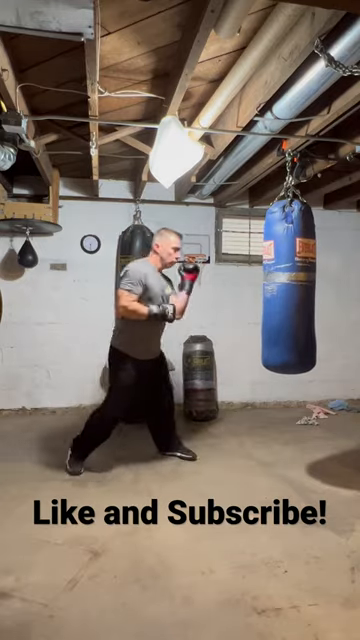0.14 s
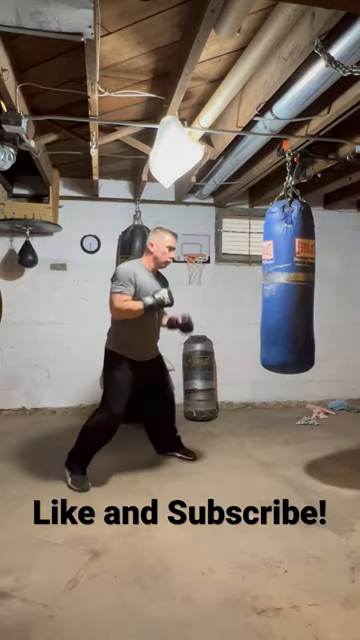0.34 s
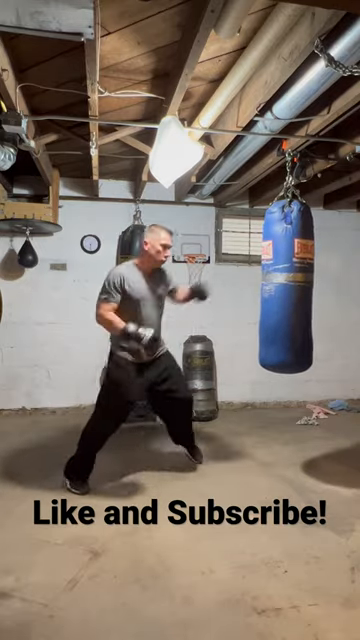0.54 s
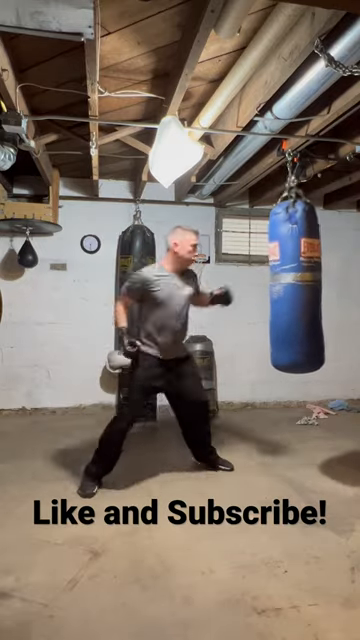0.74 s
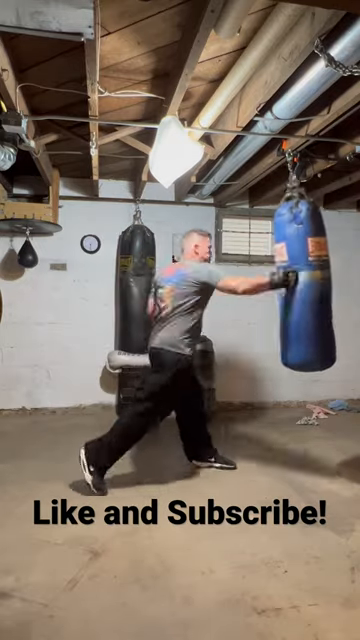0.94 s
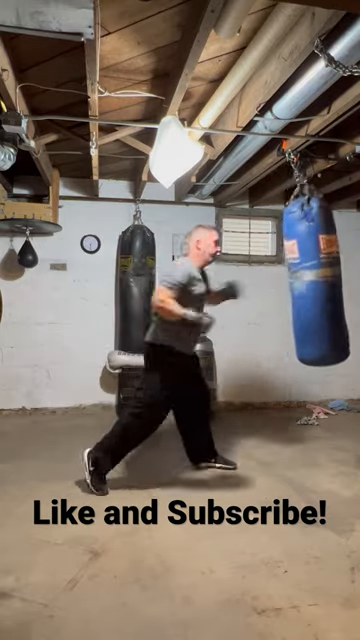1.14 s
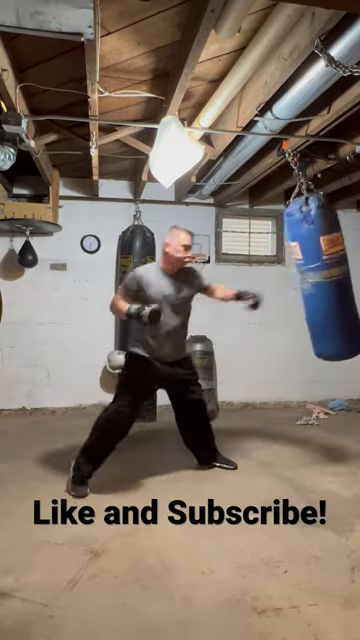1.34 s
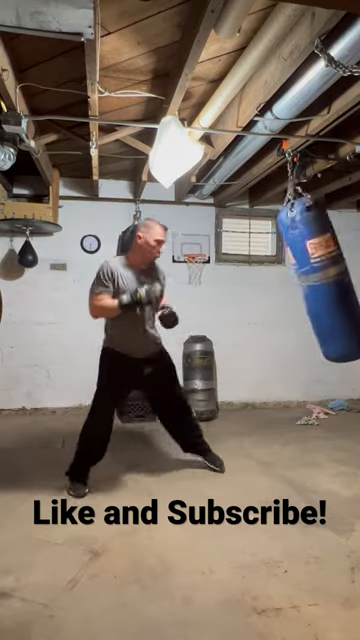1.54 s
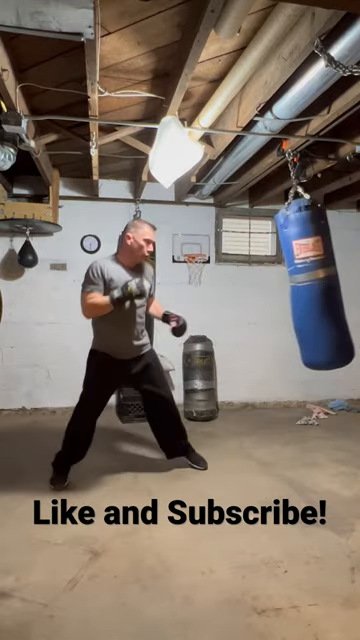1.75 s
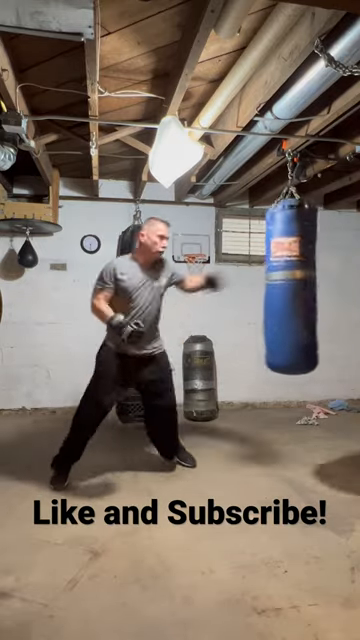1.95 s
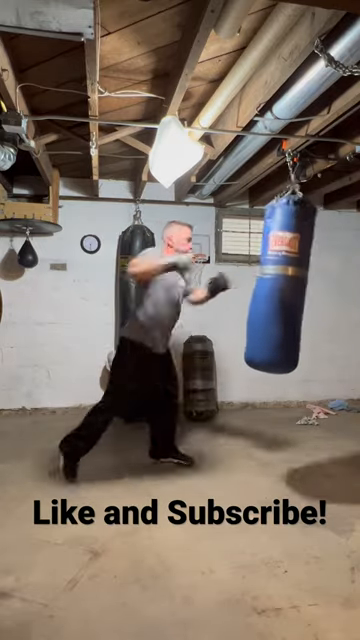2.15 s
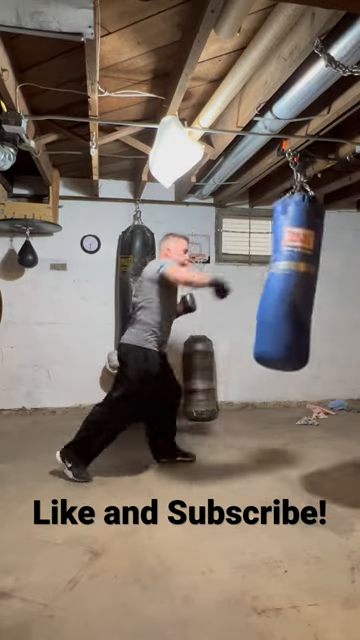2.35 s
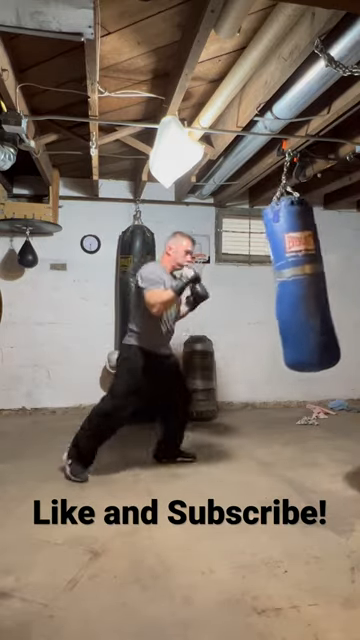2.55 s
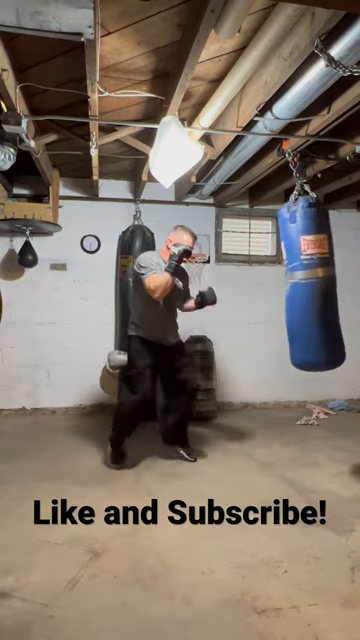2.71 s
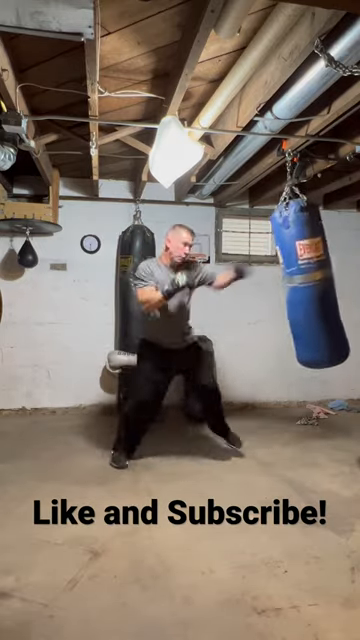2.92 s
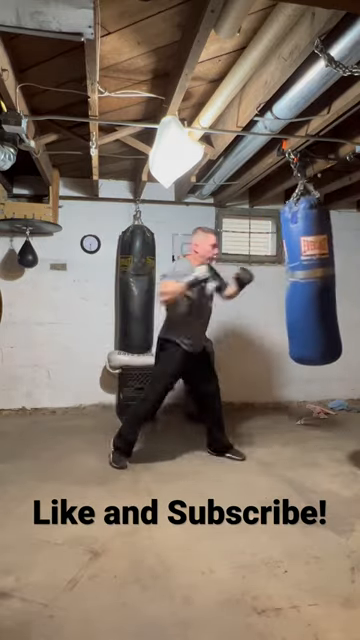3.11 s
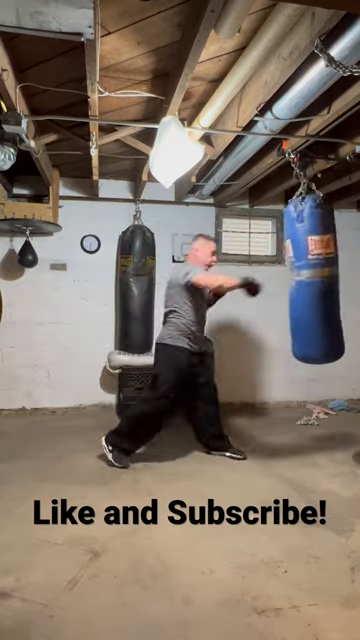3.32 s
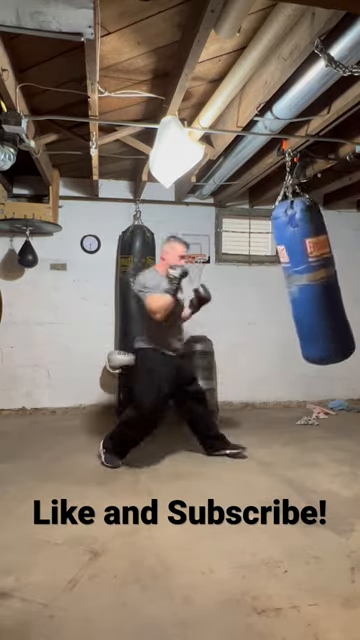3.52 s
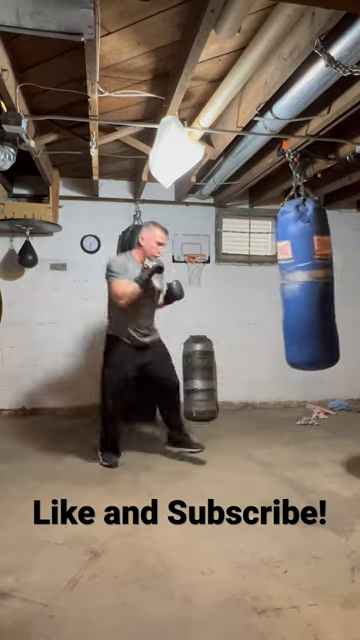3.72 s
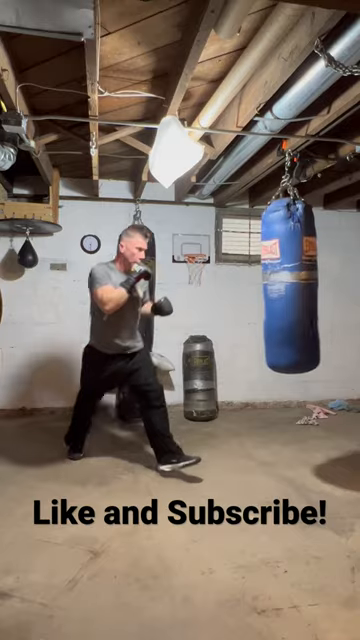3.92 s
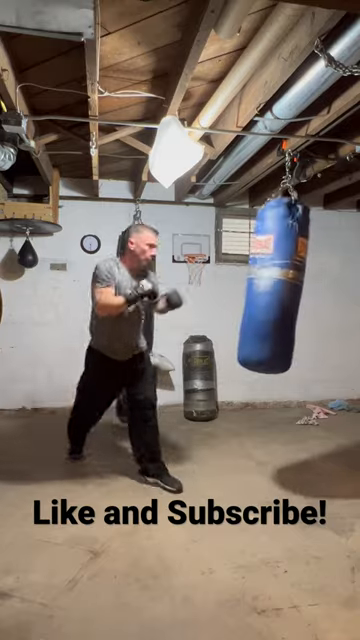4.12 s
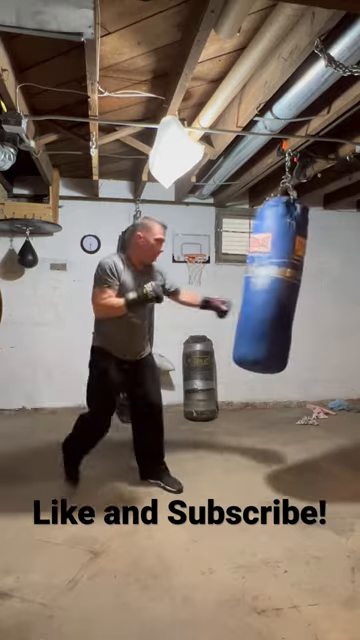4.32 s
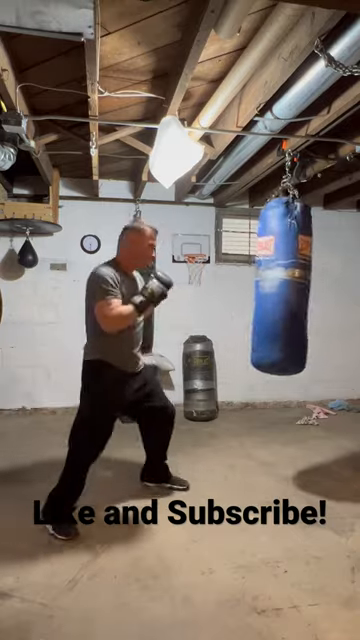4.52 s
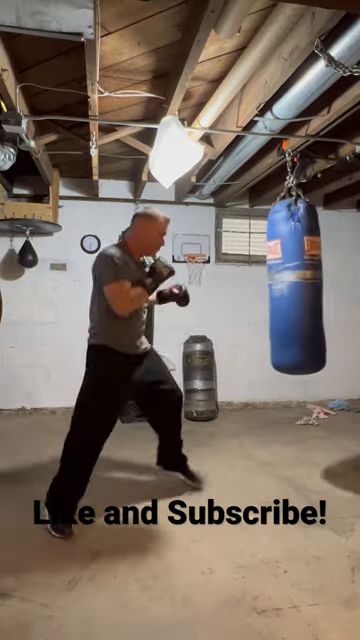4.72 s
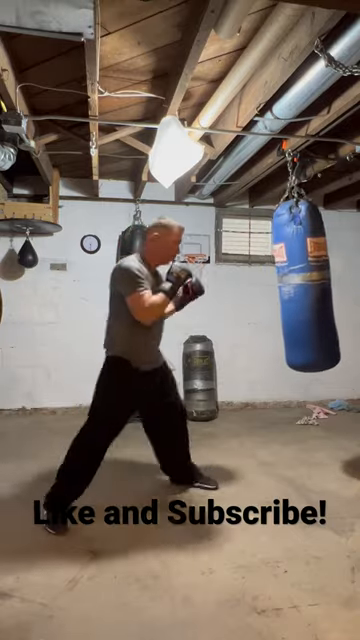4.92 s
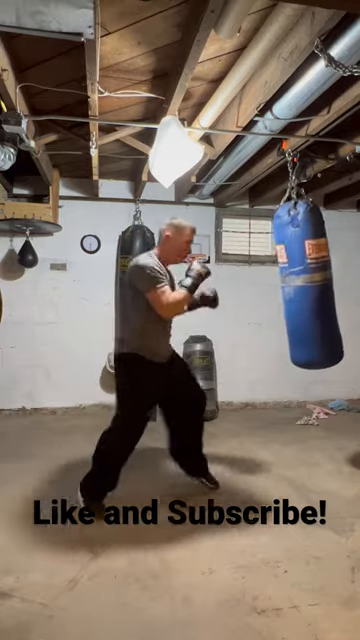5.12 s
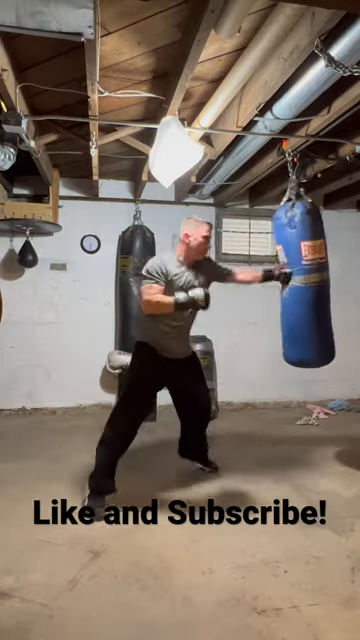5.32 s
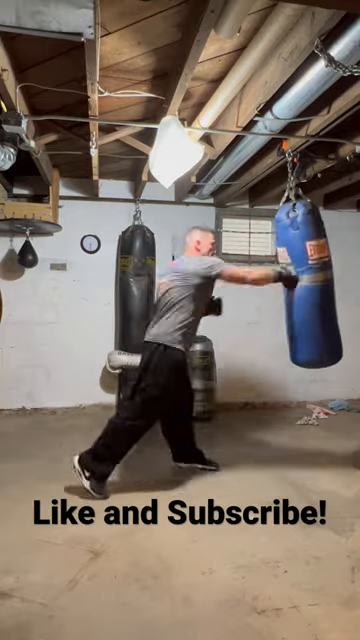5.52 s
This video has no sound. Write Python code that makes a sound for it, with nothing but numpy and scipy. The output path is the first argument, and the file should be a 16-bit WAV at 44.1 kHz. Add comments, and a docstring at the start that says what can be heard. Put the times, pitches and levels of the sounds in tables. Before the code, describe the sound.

Heard from a few metres off in a concrete basement, three punches smack a heavy bag, followed by two pairs, a lone light jab and a final hard pair. Every blow pops and thuds, setting off a low boom and a short echo. Steel chain links jingle between the hits, while shoes shuffle, tap and give small squeaks over a faint rustle of clothes.

```python
"""Ten boxing punches land on a hanging heavy bag in a concrete basement, a few metres away.
Each is a leather slap, a hollow pop of trapped air and a deep shove that makes the room boom.
The bag's chain jingles as its steel links knock together. Shoes step, scuff and squeak on the
gritty floor, and clothes rustle over a faint hush of air."""
import sys
import numpy as np
from scipy import signal
from scipy.fft import rfft, irfft
from scipy.io import wavfile
from scipy.ndimage import uniform_filter1d

SR = 44100
rng = np.random.default_rng(int(sys.argv[2]) if len(sys.argv) > 2 else 0)


def dump_mix(stems):
    """Bounce the given channels to the path in sys.argv[1] as a 16-bit WAV at rate SR."""
    frames = np.atleast_2d(stems).T  # one column per channel
    limited = np.clip(frames, -1, 1)  # hard clip at full scale
    pcm = np.round(limited * 32767).astype(np.int16)
    wavfile.write(sys.argv[1], SR, pcm)


N = 245195

# The blows. Each row: start in seconds, then relative levels in dB of the force, the slap,
# the shove of air, the room's boom, the room's thump and the cover's crunch.
PUNCHES = [(0.5686, 0, 9, -25, -19.5, -38, -2), (0.9321, 11, 15.5, -16.5, -19, -19.5, 9),
           (1.2157, 6.5, 14, -19.5, -19.5, -30, 0.5), (2.0028, 1.5, 4, -17, -20.5, -26, 2),
           (2.2282, 8, 13, -15, -15.5, -25, 13.5), (2.9653, 5, 8, -18.5, -20.5, -28, 4),
           (3.2079, 10, 12, -16, -17, -21, 8), (4.2097, -1, 3.5, -37, -26, -25.5, -9),
           (5.301, 12, 11.5, -19, -17, -19.5, -5), (5.509, 10, 12, -14.5, -15, -27, 9)]
# The tone of rubbing clothes and bag cover. Each row: frequency in Hz, level in dB.
CLOTH = [(100, -14), (400, 2), (1000, -8.5), (3000, -7.5), (8000, -14), (12000, -30), (16000, -45)]


def punch(force_db, slap_db, shove_db, boom_db, thump_db, crunch_db):
    """Leather meets leather, trapped air pops, the filling gives way; the walls answer."""
    # Wall echoes. Each row: delay in seconds, gain for low sounds, gain for high sounds.
    # Some gains are negative: the bag pushes air on one side and pulls it on the other.
    echoes = [(.0098, 1.1, .08), (.0136, .15, .15), (.0194, -1.6, .1), (.0222, .45, .07), (.0254, .8, .05),
              (.0322, -.8, .05), (.035, .25, .04)]
    t = clock(.15)
    slap = leather_slap(t, slap_db, crunch_db)
    pop = amp(force_db) * (glove_pop(t, force_db) + filling_thud(t, crunch_db))
    shove = amp(shove_db) * air_shove(t)
    out = basement(slap + .5 * pop + 3 * shove)
    middle = out[0]
    add(middle, 0, .16 * slap + .38 * pop - 2.9 * shove)  # straight to the listener
    add(middle, .00255, .16 * slap + .71 * pop + shove / 2)  # off the floor
    for delay, low, high in echoes:
        add(middle, delay, low * (3 * shove + .22 * pop) + high * slap)
    far_wall_s = .0107  # time for the shove to reach the far wall
    add(middle, far_wall_s, amp(boom_db) * room_boom(shove_db) + amp(thump_db) * room_thump())
    return out


def leather_slap(t, slap_db, crunch_db):
    """The glove smacks the bag and the cover crunches."""
    # The tone of leather. Each row: frequency in Hz, level in dB.
    leather = [(200, -25.5), (900, -3.5), (1600, -4.5), (2900, 0), (4100, -3.5), (5100, -7.5), (7200, 0.5),
               (10000, -11), (16000, -10.5)]
    crunch = colour(grains(len(t), spread_db=5) * t * np.exp(-t / .012), leather)
    slap = colour(smack(len(t)), leather)
    return amp(slap_db) * unit(slap) + amp(crunch_db) * unit(crunch)


def glove_pop(t, force_db, dive_s=.0015, swell_s=.0016):
    """The padding flattens against the bag: a pop whose pitch dives as more of it touches."""
    tightness = .803 + .02 * force_db  # a harder punch stretches the skin and raises the pitch
    hz = tightness * (204 + (1325 - 204) * np.exp(-t / dive_s))
    return unit(t * np.exp(-t / swell_s) * np.sin(2 * np.pi * np.cumsum(hz) / SR))


def filling_thud(t, crunch_db, swell_s=.014):
    """Packed rags shift in clumps: a dense thud with no pitch."""
    # The tone of the rags. Each row: frequency in Hz, level in dB.
    rags = [(100, -20.5), (220, -3.5), (330, -1), (480, -3.5), (740, -1.5), (1050, -9.5), (1500, -12.5),
            (2500, -16), (6000, -73)]
    clumps = grains(len(t), spread_db=4) * t * np.exp(-t / swell_s)
    return amp(-8 + .5 * crunch_db) * unit(colour(clumps, rags))


def air_shove(t, push_s=.0007, pull_s=.007):
    """The bag gives the air a short push, then a long, shallow pull."""
    push = (t / push_s) ** 2 * np.exp(-t / push_s) / 2
    pull = .0084 * t / pull_s * np.exp(1 - t / pull_s)
    return push - pull


def room_thump():
    """A short blow wakes the room's higher standing waves, which ring with a few low tones."""
    # The room's upper tones. Each row: pitch in Hz, level in dB, seconds to fade by 60 dB.
    tones = [(88.6, -1.5, 0.29), (157, 0, 0.32), (225.2, -3.5, 0.4), (334, -7, 0.27)]
    t = clock(1.3)
    thump = sum(amp(db - 60 * t / fade_s) * np.cos(2 * np.pi * hz * t) for hz, db, fade_s in tones)
    return thump * (1 - np.exp(-t / .0012))


def room_boom(shove_db, full_shove_db=-19.5):
    """Deep waves bounce between walls, floor and ceiling; a light jab barely wakes the deepest."""
    # The room's deep tones. Each row: pitch in Hz, level in dB, seconds to fade by 60 dB.
    tones = [(33.4, -16, 0.31), (56.2, -16.5, 0.59), (63.8, -31.5, 4.4), (74.2, -13.5, 0.78),
             (94, -27, 1.5)]
    t = clock(1.3)
    boom = np.zeros(len(t))
    for hz, db, fade_s in tones:
        bass_db = (shove_db - full_shove_db) * np.log2(100 / hz)
        boom += amp(db + bass_db - 60 * t / fade_s) * np.cos(2 * np.pi * hz * t)
    return boom * (1 - np.exp(-t / .0081))


def grazes(lead_s=.018):
    """The glove brushes the bag's cover just before each blow."""
    t, out = clock(lead_s), np.zeros(N)
    for start, force_db, *_ in PUNCHES:
        brush = np.sqrt(t) * colour(grains(len(t), spread_db=3.6), CLOTH)
        add(out, start - lead_s, amp(force_db - 24.5) * unit(brush))
    return out


def chain(knocks_per_s=700, detune=.0029):
    """The bag drops back into its chain or the links slip: steel knocks swell and die away."""
    # Each row: start in seconds, level in dB, swell in seconds, pitch of the leading link in Hz.
    jingles = [(0.601, -3, 0.027, 11200), (0.691, -9, 0.037, 10150), (1.149, 7.5, 0.022, 9830),
               (1.305, 7.5, 0.032, 11200), (1.46, -7, 0.0074, 9850), (1.603, -18, 0.0021, 10360),
               (1.72, -21, 0.047, 11200), (1.976, -18.5, 0.0028, 11200), (2.036, -1.5, 0.031, 10050),
               (2.13, -9, 0.01, 11200), (2.3, 9.5, 0.014, 10940), (2.39, -1, 0.013, 10630),
               (2.682, -13.5, 0.004, 11200), (3.02, 4.5, 0.0048, 10080), (3.147, -1, 0.0086, 11200),
               (3.272, 2.5, 0.023, 10100), (3.699, -12, .014, 11300), (5.381, 2, 0.028, 11350)]
    # The steel links. Each row: pitch in Hz, level in dB, seconds to fade by 60 dB.
    links = [(6250, -1.5, 0.012), (7540, -6, 0.02), (9800, -0.5, 0.035), (10600, -16, 0.035),
             (11200, 1, 0.044), (11960, -0.5, 0.033)]
    # The tone of a dry steel tick. Each row: frequency in Hz, level in dB.
    tick = [(1000, -3), (5000, -6.5), (6500, -2), (9000, 1), (11000, 5), (16000, -12)]
    t, out = clock(.25), np.zeros(N)

    def knocked(swell_s, link):
        """One link sounds under its own flurry of knocks."""
        knocks = grains(len(t), spread_db=1.5) * (rng.random(len(t)) < knocks_per_s / SR)
        flurry = knocks * t * np.exp(-t / swell_s)
        return unit(signal.fftconvolve(flurry, link)[:len(t)])

    def ring(hz, fade_s):
        """The dying tone of one link."""
        return amp(-60 * t / fade_s) * np.sin(2 * np.pi * hz * t)

    for start, db, swell_s, lead_hz in jingles:
        ringing = sum(amp(link_db) * knocked(swell_s, ring(hz * rng.normal(1, detune), fade_s))
                      for hz, link_db, fade_s in links)
        lead = amp(-3.5) * knocked(swell_s, ring(lead_hz, fade_s=.038))
        ticks = amp(.5) * knocked(swell_s, causal(tick))
        add(out, start, amp(db) * unit(.83 * unit(ringing) + lead + ticks))
    return out


def steps():
    """A shoe lands with a dull heel thud and a sharp tap of the sole."""
    # Each row: start in seconds, thud level in dB, tap level in dB.
    footfalls = [(1.157, -5, -12), (1.752, -13.5, -16), (2.738, -10.5, -35), (3.623, -32, -29.5),
                 (3.959, -28, -43), (4.119, -19.5, -40), (4.766, -19.5, -37), (4.825, -19, -23),
                 (4.886, -16, -13), (4.901, -17, -18), (5.073, -14.5, -14.5)]
    # The tones of heel and sole. Each row: frequency in Hz, level in dB.
    heel = [(30, -33), (90, -2.5), (200, -4), (450, 0.5), (900, -6), (1700, -18), (4000, -21.5)]
    sole = [(300, -6.5), (900, -4), (1400, -1.5), (2300, -8), (4500, -7), (12000, -41)]
    t, out = clock(.08), np.zeros(N)
    for start, thud_db, tap_db in footfalls:
        landing = (t == 0) + .23 * grains(len(t), spread_db=4.9) * np.exp(-t / .011)
        thud = amp(thud_db) * unit(colour(landing, heel))
        tap = amp(tap_db) * unit(colour(smack(len(t)), sole))
        add(out, start, thud + tap)
    return out


def slide(start, db, rise_s, hold_s, fade_s, touch_db=-11.5):
    """The loudness of one rub: a light touch, growing pressure, full weight, then a fade."""
    t = np.arange(N) / SR - start
    pressing = amp(db + touch_db * np.clip(1 - t / rise_s, 0, 1))
    return (t >= 0) * pressing * np.exp(-np.maximum(t - rise_s - hold_s, 0) / fade_s)


def scuffs(combination_s=.4, rasp_db=3.5):
    """Grit crackles under sliding soles and hard-pressed rubber rasps; arm swings share the noise."""
    # Soles sliding on concrete. Each row: start in seconds, level in dB, then rise, hold and
    # fade times in seconds.
    slides = [(0, -47.5, 0.0015, 0.011, 0.093), (.262, -30.5, 0.048, .013, 0.0059),
              (.84, -38.5, 0.016, 0.014, 0.37), (1.61, -40, 0.037, 0.011, 0.089),
              (2.02, -36.5, 0.041, .013, 0.2), (2.735, -34, 0.005, 0.012, 0.02),
              (3.7, -42.5, 0.052, 0.018, 0.019), (3.839, -35, .0086, 0.012, 0.035),
              (4.008, -40, 0.032, 0.026, .045), (4.443, -26.5, 0.018, 0.019, .013),
              (4.688, -39.5, 0.0068, 0.017, 0.029), (4.765, -35, 0.00072, .005, 0.024),
              (4.935, -42.5, 0.0077, 0.012, 0.061), (5.072, -31.5, 0.0035, 0.025, 0.026),
              (5.33, -31.5, 0.064, .013, 0.25)]
    # The tones of grit and of pressed rubber. Each row: frequency in Hz, level in dB.
    grit = [(100, -62), (400, -28.5), (1000, -7.5), (2200, -5.5), (3700, -3.5), (5100, -4.5), (7400, 2),
            (10500, -6), (16000, -23)]
    rubber = [(120, -24), (450, -23.5), (1200, -13), (2200, -7), (3100, 0.5), (3750, 3.5), (4900, -4),
              (7500, -1.5), (12000, -31)]
    times = [row[0] for row in PUNCHES]
    follow_ups = [s for last, s in zip(times, times[1:]) if s - last < combination_s]
    swings = [(s - .034, -44, .034, 0, .01) for s in times]  # the arm shoots out
    pivots = [(s - .103, -46.5, .022, 0, .52) for s in follow_ups]  # the rear foot turns
    weight = np.sqrt(sum(slide(*row) ** 2 for row in slides + swings + pivots))
    rasp = amp(rasp_db) * weight / weight.max() * evened(colour(rng.standard_normal(N), rubber))
    crackle = evened(colour(grains(N, spread_db=6.3), grit))
    return weight * (crackle + rasp)


def squeaks():
    """Twisting rubber soles stick and slip in short spurts at an unsteady pitch."""
    # Each row: start and length in seconds, level in dB, pitch in Hz, then the pitch's bend and
    # jitter as shares of it.
    spurts = [(2.734, 0.023, -28, 4555, -0.000073, .027), (2.754, 0.036, -33, 4270, -.02, .04),
              (2.785, .02, -29, 4540, 0.015, 0.033), (2.825, 0.013, -33, 4560, 0.014, 0.024),
              (5.4, 0.021, -22, 3900, 0.018, 0.019), (5.426, 0.011, -19.5, 3976, 0.013, .02),
              (5.44, 0.0081, -19, 3950, 0.0051, .02), (5.452, 0.011, -30, 3890, .02, .05),
              (5.523, .003, -9.5, 4130, .01, 0.071)]
    out = np.zeros(N)
    for start, length, db, hz, bend, jitter in spurts:
        t = clock(length)
        waver = evened(uniform_filter1d(rng.standard_normal(SR), size=50))[:len(t)]
        press = np.sin(np.pi * t / length)
        pitch = hz * (1 + bend * press + jitter * waver)
        add(out, start, amp(db) * np.sqrt(abs(press)) * np.sin(2 * np.pi * np.cumsum(pitch) / SR))
    return out


def dry_snaps():
    """A sharp, dry click snaps out now and then."""
    # Each row: start in seconds, level in dB.
    snaps = [(3.6234, -15.5), (4.688, -18)]
    # The tone of a crack. Each row: frequency in Hz, level in dB.
    crack = [(500, -17), (1800, -15), (2700, 5), (4000, 1), (6000, 0), (8000, -9), (14000, -19)]
    out = np.zeros(N)
    for start, db in snaps:
        add(out, start, amp(db) * unit(colour(smack(count=2048), crack)))
    return out


def rustle(clothes_db=-74, settle_db=-55.5, settle_s=.41, flutter_db=6, flutter_s=.065):
    """Clothes rub faintly once the boxing starts, and the bag's cover settles after each punch."""
    t = np.arange(N) / SR
    turns = np.arange(0, N / SR + flutter_s, flutter_s)
    flutter = amp(np.interp(t, turns, flutter_db * rng.standard_normal(len(turns))))
    power = (t > PUNCHES[0][0]) * amp(clothes_db) ** 2
    for start, force_db, *_ in PUNCHES:
        power += ((t > start) * amp(settle_db + force_db) * np.exp(-abs(t - start) / settle_s)) ** 2
    return np.sqrt(power) * flutter * evened(colour(grains(N, spread_db=.59), CLOTH))


def basement(x, build_s=.00067, direct_side=.33):
    """Adds the walls' blurred echo; returns middle (left plus right) and side (left minus right)."""
    # How long the echo lasts. Each row: frequency in Hz, seconds to fade by 60 dB.
    fades = [(40, 3), (75, 1.5), (160, 1.01), (400, 0.42), (1100, 0.43), (3000, 0.42), (7500, 0.48),
             (11000, 0.44), (15000, 0.6)]
    # How loud it is. Each row: frequency in Hz, level in dB against the direct sound.
    levels = [(22, -29), (42, -5), (70, 16.5), (95, 2.5), (122, -1), (160, 13), (210, 5.5), (280, 8.5),
              (400, 4), (520, 6), (750, 7), (1200, 3.1), (1500, -1), (4000, 4.5), (7000, 1), (12000, 0.5),
              (14500, -26)]
    t = clock(1.3)
    hz, times, bands = signal.stft(rng.standard_normal((2, len(t))), SR, nperseg=1024)
    fade_s = read(fades, hz)[:, None]
    same_energy = np.sqrt(2 * np.log(1000) / (fade_s * SR))  # a longer fade adds no energy
    bands = bands * amp(read(levels, hz)[:, None] - 60 * times / fade_s) * same_energy
    echo = signal.istft(bands, SR, nperseg=1024)[1][:, :len(t)]
    echo *= 1 - np.exp(-(t / build_s) ** 2)
    echo[:, 0] += [1, direct_side]  # the direct sound
    return signal.fftconvolve(x[None], echo, axes=1)


def still_air():
    """The room's steady hush, as middle and side."""
    # The tone of the hush. Each row: frequency in Hz, level in dB.
    hush = [(20, -21), (55, -13), (120, -21), (260, -26), (1000, -16.5), (3000, -15.5), (9000, -46),
            (16000, -33)]
    return np.array([evened(colour(rng.standard_normal(N), hush)) for _ in range(2)])


def smack(count, fade_s=.0011):
    """Two surfaces do not meet all at once: a tiny rough burst, equally strong at every frequency."""
    t = clock(.006)
    spectrum = rfft(rng.standard_normal(len(t)) * np.exp(-t / fade_s))
    burst = irfft(spectrum / abs(spectrum))
    return np.pad(burst, (0, count - len(burst)))


def grains(count, spread_db):
    """A stream of tiny contacts of uneven size."""
    return evened(rng.standard_normal(count) * amp(spread_db * rng.standard_normal(count).clip(-2, 2)))


def colour(x, points):
    """Gives a sound the tone set by rows of frequency and level."""
    return signal.fftconvolve(x, causal(points))[:len(x)]


def causal(points, size=8192):
    """The sharpest click that has this tone and no sound before its start."""
    log_gain = np.log(amp(read(points, abs(np.fft.fftfreq(size, 1 / SR)))))
    return np.fft.ifft(np.exp(np.conj(signal.hilbert(log_gain)))).real[:size // 2]


def read(points, hz):
    """Reads between a table's rows at these frequencies."""
    frequencies, values = np.transpose(points)
    return np.interp(np.log(hz + 1), np.log(frequencies + 1), values)


def amp(db):
    """Turns dB into a gain."""
    return 10 ** (np.asarray(db) / 20)


def unit(x):
    """Scales a sound to a total energy of one."""
    return x / (np.linalg.norm(x) + 1e-20)


def evened(x):
    """Scales a sound to an average power of one."""
    return x / np.sqrt(np.mean(x ** 2) + 1e-20)


def clock(seconds):
    """The time of each sample."""
    return np.arange(int(seconds * SR)) / SR


def add(mix, start, sound):
    """Mixes a sound in at a time in seconds."""
    part = mix[..., max(round(start * SR), 0):][..., :sound.shape[-1]]
    part += sound[..., :part.shape[-1]]


def scene(chain_db=-6, feet_db=-4, air_db=-61):
    """Punches, chain, footwork and cloth in one room, heard as left and right."""
    # The tones of the stereo middle and side. Each row: frequency in Hz, gain in dB.
    middle_tone = [(14, -45), (40, 12.5), (11400, -12.5), (12300, -22), (13200, -42), (16500, -36)]
    side_tone = [(60, -70), (125, -30), (250, -18), (500, -5), (4200, -13.5), (5300, -5.5), (7200, -54),
                 (8000, -9.5), (11000, -9), (16000, 15)]
    feet = scuffs() + squeaks() + steps() + dry_snaps()
    links = chain()
    mix = basement(1.046 * links + grazes() + rustle() + .8 * feet)[:, :N]
    # Extra direct sound: the chain hangs in clear view, and the feet are nearer than the bag.
    mix += np.array([[1], [.5]]) * (amp(chain_db) * links + amp(feet_db) * feet)
    for start, *blow in PUNCHES:
        add(mix, start + .001097, punch(*blow))
    mix += amp(air_db) * still_air()
    middle, side = colour(mix[0], middle_tone), colour(mix[1], side_tone)
    return np.array([middle + side, middle - side])


def record(dry, top_hz=16500):
    """Rounds off the loudest peaks, then cuts the highest treble."""
    rounded = dry / (1 + dry ** 6) ** (1 / 6)
    treble_cut = signal.firwin(511, top_hz, window=("kaiser", 9), fs=SR)
    return signal.oaconvolve(rounded, treble_cut[None], "same", axes=1)


dry = scene()
out = record(dry)
dump_mix(out)
```